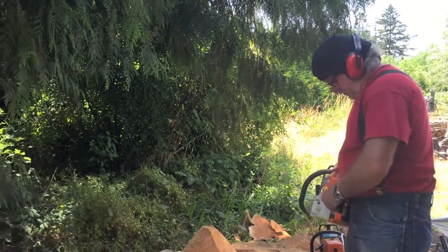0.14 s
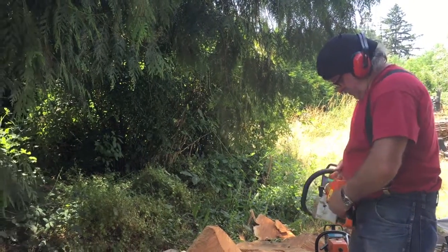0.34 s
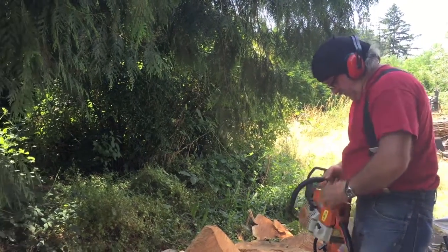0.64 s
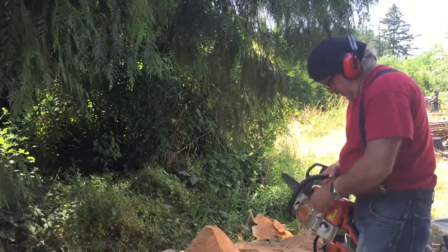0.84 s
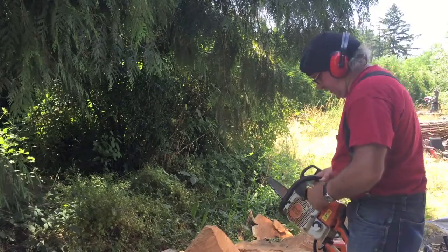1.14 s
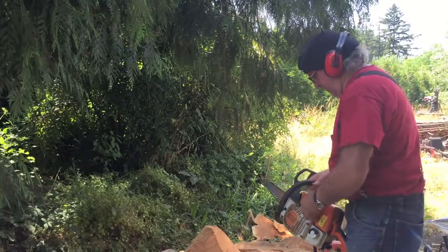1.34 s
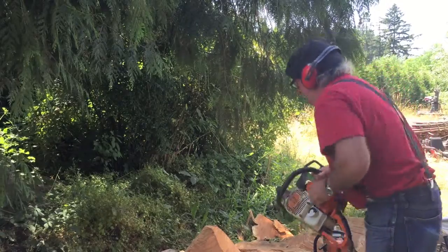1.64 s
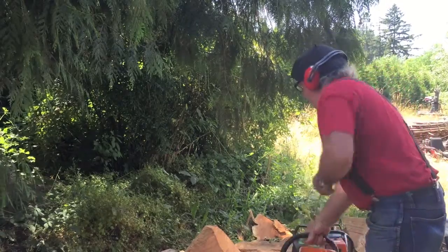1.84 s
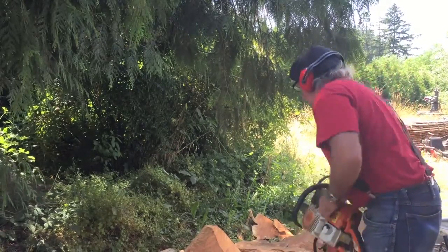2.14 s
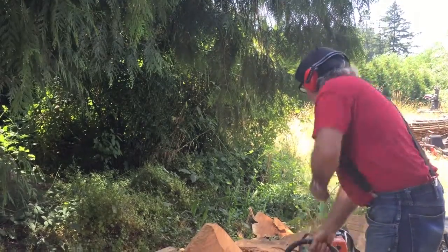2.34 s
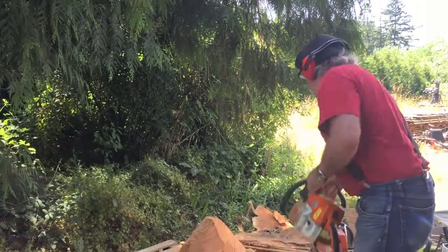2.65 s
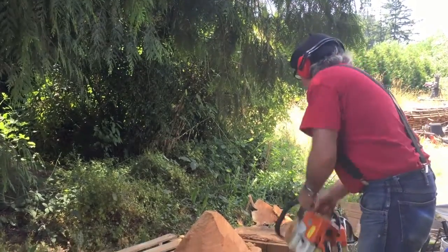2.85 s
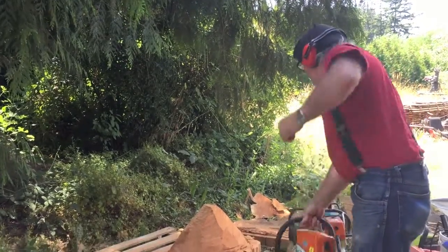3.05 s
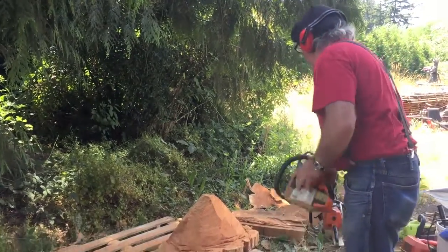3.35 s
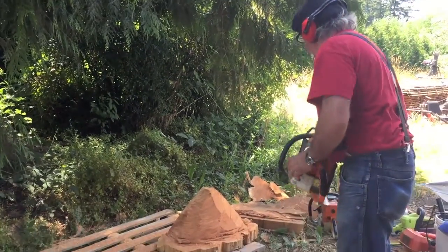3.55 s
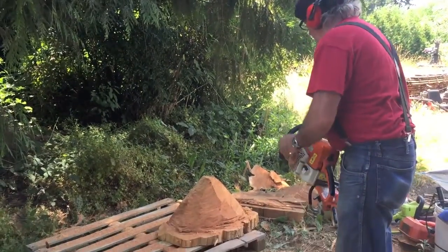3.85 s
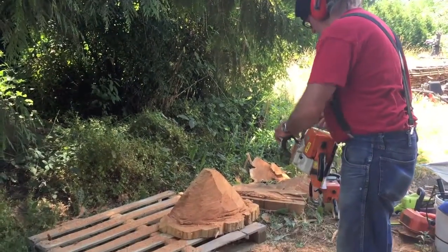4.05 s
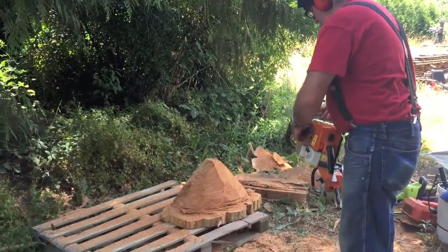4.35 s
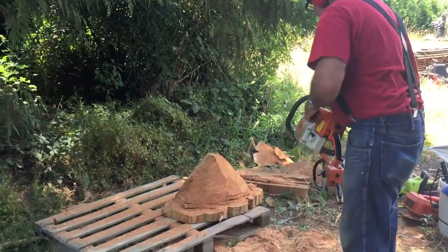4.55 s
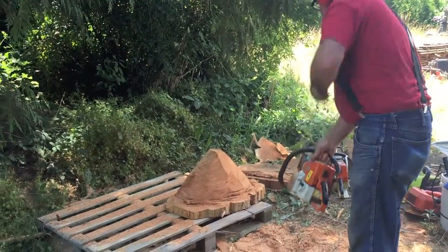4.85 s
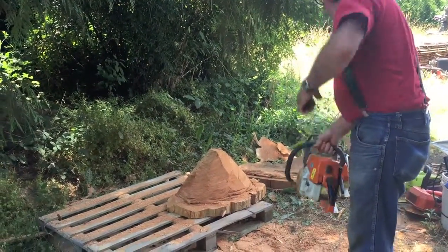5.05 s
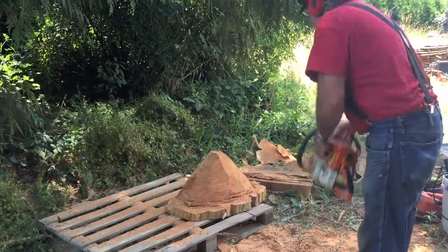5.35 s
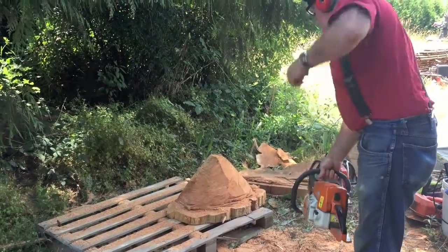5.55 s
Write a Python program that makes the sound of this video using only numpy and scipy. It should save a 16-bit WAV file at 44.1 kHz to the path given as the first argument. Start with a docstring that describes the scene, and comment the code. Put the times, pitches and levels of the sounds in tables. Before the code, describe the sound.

In a quiet clearing, a chainsaw a few metres from the microphone is clicked and handled, then pulled three times in quick succession. Each pull gives a hard clack, a raspy whirr and rapid low chuffs that slow down. The third kicks briefly with a metallic chain rattle. After a loud clack and a quieter pause, two more pulls fail. A faint bird whistles.

```python
"""Chainsaw that will not start

A chainsaw is drop-started five times in a clearing, a few metres away, and does not catch: pawls clack in as chattering
noise through resonances, the cord whirrs as coloured noise, and the piston chuffs with pulses and decaying sines, slowing
as the crank coasts. On the third pull one kick speeds up the crank and rattles the chain. The saw is handled and its
switches click, and a far bird whistles in arched sine notes over a hush of coloured noise."""
import sys
import numpy as np
from scipy import signal
from scipy.fft import rfft, irfft, next_fast_len
from scipy.io import wavfile

SR = 44100
rng = np.random.default_rng(int(sys.argv[2]) if len(sys.argv) > 2 else 0)


def transcribe(signal):
    """Save signal, clipped to [-1, 1], as a 16-bit WAV file at the path in sys.argv[1]."""
    frames = np.atleast_2d(signal).T
    limited = np.clip(frames, -1, 1)
    pcm = np.round(limited * 32767).astype(np.int16)
    wavfile.write(sys.argv[1], SR, pcm)


N = 252010
TIME = np.arange(N) / SR

# Pulls of the cord. Each row: pawls catch in seconds, delay to the first full chuff in seconds,
# crank turns per second, hold in seconds, coasting time constant in seconds.
PULLS = [(1.831, .0595, 31.66, .0541, .1153), (2.363, .0541, 36.25, .0649, .2272),
         (2.914, .0623, 33.92, .2578, .2313), (4.834, .054, 31.64, .0787, .2913),
         (5.441, .056, 33.8, .1319, .1329)]
# The sound of each pull. Each row: whirr in dB before the cord's trim, chuff in dB, clack in dB, clack in Hz,
# snap in dB re clack, weakening per earlier skip in dB.
PULL_SOUNDS = [(-40.5, -25, -22, 1310, -2, 16), (-40, -25, -17.5, 1360, -3.5, 4.5),
               (-42, -25, -22, 1430, -8, 29), (-43.5, -25.5, -20.5, 1410, 1, 6),
               (-43, -23.5, -21, 1520, -7.5, 16)]
# Sharp clicks of switches, handle and hard parts. Each row: start in seconds, level in dB,
# clack in Hz, snap in dB re level.
CLICKS = [(.13, -29.5, 2370, -3.5), (0.264, -57, 2600, -4), (.29, -36.5, 2300, -12.5),
          (0.484, -50.5, 2060, -17), (1.04, -59.5, 2120, 4), (1.083, -38, 1030, -6),
          (1.127, -45.5, 1070, 7), (1.15, -29.5, 1510, -5), (1.178, -60.5, 1450, 14),
          (1.362, -60.5, 1550, 9.5), (1.468, -51, 1530, 8), (1.493, -36, 1490, -2),
          (2.277, -51.5, 2200, -4), (2.648, -59, 2280, -15), (3.03, -30.5, 1280, -4.5),
          (3.049, -25.5, 2280, 0.5), (3.068, -24.5, 2570, -5), (3.183, -33, 1400, 2),
          (3.347, -17.5, 1420, -3), (3.421, -44, 2280, -24), (3.495, -47.5, 2100, -43),
          (3.543, -50.5, 2650, 2), (3.775, -49.5, 2320, -7.5), (4.054, -54.5, 1880, -12.5),
          (4.239, -45.5, 2280, 0.5), (4.427, -45, 1135, -20), (4.494, -32, 1704, -5), (4.633, -56, 1520, 0),
          (4.709, -62.5, 2480, 5.5), (4.971, -34.5, 1040, -4), (5.146, -40.5, 2270, -9),
          (5.23, -48.5, 1220, -4), (5.32, -42, 1460, -14), (5.422, -44.5, 1830, 1)]
# The one firing speeds the crank up by the share KICK_GAIN.
KICK_S, KICK_RISE_S, KICK_GAIN = 3.015, .015, .3045


def from_db(db):
    """Decibels to gain."""
    return 10 ** (np.asarray(db) / 20)


def rms_one(x):
    """Scale to unit power."""
    return x / np.sqrt(np.mean(x ** 2) + 1e-20)


def unit_energy(x):
    """Scale a short sound to the energy of 5 ms at unit power."""
    return x / np.sqrt(np.sum(x ** 2) / (.005 * SR) + 1e-20)


def add(track, s, sound):
    """Mix a sound into the track at a time in seconds."""
    at = max(int(s * SR), 0)
    track[at:at + len(sound)] += sound[:N - at]


def cut(x, hz, kind, order=2):
    """Butterworth low- or high-pass."""
    return signal.sosfilt(signal.butter(order, min(hz, .45 * SR), kind, fs=SR, output="sos"), x)


def resonate(x, hz, width_hz):
    """One two-pole resonance with a gain near 1 on top."""
    r = np.exp(-np.pi * width_hz / SR)
    feed = np.array([1, 0, -1]) * (1 - r * r) / 2
    return signal.lfilter(feed, [1, -2 * r * np.cos(2 * np.pi * hz / SR), r * r], x)


def colour(x, spectrum):
    """Give a steady sound a smooth spectrum, interpolated over log frequency; unit power."""
    hz, db = np.transpose(spectrum)
    size = next_fast_len(N)
    log_hz = np.log(np.maximum(np.fft.rfftfreq(size, 1 / SR), 1))
    gain = from_db(np.interp(log_hz, np.log(hz), db))
    return rms_one(irfft(rfft(x, size) * gain, size)[:N])


def drift(per_s):
    """Random curve with spread near 1: straight lines between random points, per_s of them a second."""
    return np.interp(TIME * per_s, np.arange(4000), rng.standard_normal(4000))


def ticks(per_s, size_db):
    """Random small contacts of uneven size and either sign; unit power."""
    sizes = from_db(size_db * np.minimum(rng.exponential(1, N), 3))
    happens = rng.random(N) < per_s / SR
    return rms_one(happens * rng.choice([-1, 1], N) * sizes)


def air(rumble_db=-72, rumble_hz=66, rumble_width_hz=28, swell_db=5.5):
    """Still air among the trees: a faint hush of coloured noise over a low, uneven rumble of resonant noise."""
    # Colour of the hush. Each row: frequency in Hz, relative density in dB per Hz.
    air_colour = [(25, -18.5), (45, -4), (70, 8.5), (110, 0.5), (200, -6), (400, -9.5), (700, -8.5),
                  (1000, -6.5), (1500, -14), (2200, -15.5), (3300, -21), (6000, -24.5), (10000, -28),
                  (15000, -33.5)]
    # Its slow level curve. Each row: time in seconds, level in dB.
    air_levels = [(0, -64.5), (0.8, -63), (1.7, -63.5), (3.9, -66), (4.7, -65.5), (5.71, -62.5)]
    level = from_db(np.interp(TIME, *np.transpose(air_levels)))
    hush = level * colour(rng.standard_normal(N), air_colour)
    rumble = resonate(rng.standard_normal(N), rumble_hz, rumble_width_hz)
    rumble = rms_one(resonate(rumble, rumble_hz, rumble_width_hz))
    return hush + from_db(rumble_db + swell_db * drift(10)) * rumble


def bird(sag=0.21, waver=0.028):
    """Each call is an arched, slightly hoarse whistle with a weaker, higher second voice."""
    # One note a call. Each row: start in seconds, length in seconds, top of the arch in Hz before waver, level in dB.
    calls = [(0.538, 0.1, 1804, -54), (2.154, 0.09, 1750, -62.5), (4.082, 0.0844, 1782, -52.5)]
    upper_ratio, upper_db = 1.62, -9
    out = np.zeros(N)
    for s, length, hz, db in calls:
        u = np.linspace(-1, 1, int(length * SR))
        pitch = hz * (1 - sag * u * u + waver * drift(610)[:len(u)])
        phase = 2 * np.pi * np.cumsum(pitch) / SR
        voices = np.sin(phase) + from_db(upper_db) * np.sin(upper_ratio * phase)
        add(out, s, from_db(db) * (1 - u * u) ** 2 * voices)
    return out


def shell(x):
    """The hard parts of the saw ring side by side, with alternating sign."""
    # Resonances rung by clacks, cord and rattles. Each row: frequency in Hz, width in Hz, gain in dB.
    shell_modes = [(2220, 67, -1), (2604, 50, -11), (3418, 410, -2), (4030, 130, 2.5), (4470, 310, -2),
                   (5435, 340, 3.5), (5670, 1200, -1), (6930, 520, 1.5), (7180, 410, -0.5),
                   (8900, 970, -1.5), (9500, 1200, -6.5), (13100, 4700, -8)]
    return sum((-1) ** k * from_db(db) * resonate(x, hz, width) for k, (hz, width, db) in enumerate(shell_modes))


def knock(thud_db, thud_hz, clack_db, clack_hz, snap_db, rise_s=0.0029, fall_s=0.0028, thud_width_hz=130,
          clack_width_hz=300, hollow_db=-8, case_db=-3, case_hz=1500, case_width_hz=900, crack_db=-15):
    """One contact: a few ms of chatter that rings the hollow housing, the struck plastic part and the hard shell."""
    t = np.arange(int(.05 * SR)) / SR
    contact = np.minimum(t / rise_s, 1) ** 2 * np.exp(-np.maximum(t - rise_s, 0) / fall_s)
    low, mid, high = rng.laplace(size=(3, len(t))) * contact
    thud = unit_energy(resonate(low, thud_hz, thud_width_hz))
    thud = thud + from_db(hollow_db) * unit_energy(resonate(mid, 400, 280))
    thud = cut(cut(thud, 380, "high", order=4), 980, "low")
    clack = unit_energy(resonate(mid, clack_hz, clack_width_hz))
    clack = clack + from_db(case_db) * unit_energy(resonate(low, case_hz, case_width_hz))
    clack = cut(cut(clack, 680, "high"), 2700, "low", order=4)
    snap = shell(high) + from_db(crack_db) * cut(high, 4100, "high")
    return (from_db(thud_db) * unit_energy(thud)
            + from_db(clack_db) * unit_energy(clack)
            + from_db(snap_db) * unit_energy(snap))


def clicks_and_thumps(click_thud_db=-9.0, click_thud_hz=700, thump_clack_db=-11, thump_clack_hz=1150, early_s=0.0014):
    """Clicks ring mostly the struck part, thumps mostly the housing."""
    # Hollow thumps of the housing, from handling and from turns of the crank.
    # Each row: start in seconds, level in dB, thud in Hz, snap in dB re level.
    thumps = [(0.943, -43, 750, -4), (0.958, -40.5, 750, -14), (.99, -47, 660, -23), (1.049, -39, 985, -10),
              (1.394, -46, 1040, -16), (1.747, -50, 1070, -19), (2.102, -46, 490, -3.5),
              (2.236, -31.5, 640, -16), (2.613, -39.5, 490, -7), (2.795, -30.5, 1026, -18),
              (2.821, -40.5, 830, -14), (2.939, -36, 680, -35), (4.404, -48, 1010, -20),
              (4.767, -54, 1120, -16), (5.299, -36, 1000, -28), (5.461, -38, 656, -16)]
    out = np.zeros(N)
    for s, db, hz, snap_db in CLICKS:
        add(out, s - early_s, knock(db + click_thud_db, click_thud_hz, db, hz, db + snap_db))
    for s, db, hz, snap_db in thumps:
        add(out, s - early_s, knock(db, hz, db + thump_clack_db, thump_clack_hz, db + snap_db))
    return out


def rattles(per_s=2500, size_db=4):
    """Dense little contacts swell and fade, ringing the hard shell."""
    # Hard parts rattling together as the saw is handled. Each row: start in seconds, length in seconds, level in dB.
    bursts = [(1.124, .035, -45), (1.152, 0.059, -50), (1.459, 0.038, -46.5), (1.495, 0.07, -61.5),
              (4.493, 0.06, -56)]
    level = np.zeros(N)
    for s, length, db in bursts:
        add(level, s, from_db(db) * np.hanning(int(length * SR)))
    return level * rms_one(shell(ticks(per_s, size_db)))


def crank_speed(s, per_s, hold_s, coast_s):
    """Turns per second in one pull: steady while the cord is drawn, faster if the engine kicks, then coasting down."""
    speed = per_s * (TIME >= s) * np.exp(-np.maximum(TIME - s - hold_s, 0) / coast_s)
    if s < KICK_S < s + hold_s:
        return speed * (1 + KICK_GAIN * np.clip((TIME - KICK_S) / KICK_RISE_S, 0, 1))
    return speed


def crank_turns(stall_per_s=8, feeble_per_s=17.6, feeble_db_per_octave=17.5, boom_hz=66.46, boom_hz_per_speed=2.05,
                first_turn_db=-15.5):
    """One row (s, level dB, boom Hz) a turn: slow turns boom lower and fade, until compression stalls the piston."""
    # The piston rocks over again after the kick. Each row: start in seconds, level in dB, nominal boom in Hz.
    rock_back = [(3.63, -47, 90.7), (3.786, -40, 71.8), (4.25, -44.5, 101)]
    kick_pop = (3.049, -31, 80)   # the firing booms in the muffler
    rows = list(rock_back) + [kick_pop]
    for (s, delay_s, per_s, hold_s, coast_s), (_, chuff_db, *_) in zip(PULLS, PULL_SOUNDS):
        speed = crank_speed(s, per_s, hold_s, coast_s)
        turns = np.cumsum(speed * (TIME >= s + delay_s)) / SR
        # the turn before the first full chuff has little compression
        rows.append((s + delay_s - 1 / per_s, chuff_db + first_turn_db, boom_hz + boom_hz_per_speed * per_s))
        new_turn = np.diff(np.ceil(turns)) > 0
        for at in np.flatnonzero(new_turn & (speed[1:] > stall_per_s)):
            fade_db = feeble_db_per_octave * min(np.log2(speed[at] / feeble_per_s), 0)
            rows.append((at / SR, chuff_db + fade_db, boom_hz + boom_hz_per_speed * speed[at]))
    return rows


def loose_parts(turns, slow_boom_hz=101, thud_db=-17, thud_hz=600, clack_db=-16, clack_hz=2150, snap_db=-29,
                early_s=0.0021):
    """Slow turns, known by their low boom, jerk against compression, and loose parts knock."""
    out = np.zeros(N)
    for s, db, boom_hz in turns:
        if boom_hz < slow_boom_hz:
            add(out, s - early_s, from_db(db) * knock(thud_db, thud_hz, clack_db, clack_hz, snap_db))
    return out


def chain(level_db=-29, attack_s=0.045, fade_db_per_s=100, flutter_db=4.5):
    """The kick spins the chain: links clatter densely over sprocket and bar, then fade away unevenly."""
    # Colour of the clatter. Each row: frequency in Hz, relative density in dB per Hz.
    clatter = [(150, -27.5), (500, -1), (1000, -12.5), (1500, 6.5), (1900, -2), (2400, 8), (3100, 0.5),
               (3750, 11.5), (4600, 0.5), (6800, 3.5), (8200, -14), (15000, -9.5)]
    t = TIME - KICK_S
    fade_db = fade_db_per_s * np.maximum(t - attack_s, 0)
    level = np.clip(t / attack_s, 0, 1) * from_db(level_db - fade_db + flutter_db * drift(250))
    return level * colour(ticks(per_s=14000, size_db=3.0), clatter)


def pawls(thud_db=-10, thud_hz=800, early_s=0.0009, skip_s=0.006):
    """The starter pawls skip twice, ever harder, and catch the flywheel."""
    out = np.zeros(N)
    for (s, *_), (_, _, db, clack_hz, snap_db, skip_db) in zip(PULLS, PULL_SOUNDS):
        for k in range(3):   # counted back from the catch
            clack = knock(db + thud_db, thud_hz, db, clack_hz, db + snap_db)
            add(out, s - early_s - k * skip_s, from_db(-k * skip_db) * clack)
    return out


def whirr(turns, level_db=-1, tick_db=2, ring_db=-6, flutter_db=3.5, hiss_db=-11, hiss_hz=10500, fast_db=-43,
          jolt_db=-23, jolt_s=0.027, jolt_lead_s=0.008, speed_power=2.05, bite_db=2, bite_s=0.033,
          slack_db=-48, slack_s=0.057, scrape_db=-20, scrape_s=0.028):
    """The cord rubs through its eye while the ratchet ticks, louder with speed; both ring the shell, with a fast hiss."""
    # Colour of the running cord. Each row: frequency in Hz, relative density in dB per Hz.
    cord_colour = [(100, -4.5), (270, -4), (550, 2.5), (850, 1), (1400, 2.5), (1900, -2), (2350, -1),
                   (3000, -4.5), (3750, -2.5), (4400, -9.5), (6400, -15), (8500, -14), (11000, -22.5),
                   (15000, -14.5)]
    # Rubs of hand, handle and rewinding cord.
    # Each row: start in seconds, length in seconds, level in dB before the cord's trim.
    rubs = [(0.925, .019, -62), (1.103, 0.064, -55), (1.158, 0.1, -62), (1.33, 0.1, -61),
            (1.443, 0.12, -59), (1.901, 0.078, -41), (2.013, 0.035, -49), (2.066, 0.15, -54),
            (2.218, 0.099, -52), (2.611, 0.08, -49.5), (2.782, 0.014, -58), (3.344, .075, -48),
            (3.826, 0.061, -70), (4.379, 0.062, -62), (4.466, 0.082, -52), (5.204, 0.19, -68)]
    running, scrapes = np.zeros(N), np.zeros(N)
    for (s, _, per_s, hold_s, coast_s), (db, *_) in zip(PULLS, PULL_SOUNDS):
        speed = crank_speed(s, per_s, hold_s, coast_s)
        bite = from_db(bite_db * np.exp(-np.abs(TIME - s) / bite_s))   # the cord bites hardest at the catch
        running += from_db(db) * bite * (speed / speed.max()) ** speed_power
        # the slack is taken up
        add(scrapes, s - slack_s / 2, from_db(slack_db) * np.hanning(int(slack_s * SR)))
    for s, db, _ in turns:   # every turn of the crank shakes the ratchet
        add(scrapes, s - jolt_lead_s, from_db(db + jolt_db) * np.hanning(int(jolt_s * SR)))
    for s, db, *_ in CLICKS:   # a short, soft scrape swells around each click
        add(scrapes, s - scrape_s / 4, from_db(db + scrape_db) * np.hanning(int(scrape_s * SR)))
    for s, length, db in rubs:
        add(scrapes, s, from_db(db) * np.hanning(int(length * SR)))
    rub = rng.standard_normal(N) + from_db(tick_db) * ticks(per_s=450, size_db=2.5)
    sound = rms_one(colour(rub, cord_colour) + from_db(ring_db) * rms_one(shell(rub)))
    fast = np.minimum(running / from_db(fast_db), 1)
    thin_noise = rms_one(cut(rng.standard_normal(N), hiss_hz, "high", order=3))
    hiss = from_db(hiss_db) * running * fast * thin_noise
    return from_db(level_db + flutter_db * drift(200)) * ((running + scrapes) * sound + hiss)


def steel(x):
    """The steel parts pick up the mechanical noise and ring at their own pitches."""
    # Bar and clutch drum, ringing on after contacts. Each row: frequency in Hz, width in Hz, gain in dB.
    steel_modes = [(2286, 44, -10.5), (2790, 4.8, -8.5), (3810, 8.3, -2), (3480, 5, -8.5), (3770, 14, -5),
                   (5120, 42, -4), (5600, 25, -6.5)]
    return x + sum(from_db(db) * resonate(x, hz, width) for hz, width, db in steel_modes)


def chuffs(turns, puff_db=1, boom_db=-7, boom_t60=0.091, lead_db=-11, intake_db=-14, gas_db=-22, gas_s=0.028,
           gas_ratio=2.7, gas_width_hz=550, vary_db=7.5, force_db=-25, detune=.04, sag=0.068, sag_s=.025):
    """The port opens on an unfired cylinder: a small push, a sharp gulp of air, a muffler boom, a softer intake gulp."""
    # Further resonances of saw body and intake, rung by each chuff.
    # Each row: frequency in Hz, mean level in dB, decay by 60 dB in seconds.
    cavity = [(83.3, -18.5, 0.075), (183, -25.5, 0.079), (318.6, -17.5, 0.074), (465, -42, 0.043),
              (611, -32.5, 0.016), (920, -19.5, 0.015)]
    out = np.zeros(N)
    t = np.arange(int(.15 * SR)) / SR - .006
    puff_s, lead_s, ground_s = .00029, .003, .00185
    late = np.maximum(t - puff_s * 3, 0)

    def pulse(at):
        return np.exp(-.5 * ((t - at) / puff_s - 2) ** 2)

    for s, db, boom_hz in turns:
        gulp = -from_db(puff_db) * pulse(0)
        push = from_db(lead_db) * pulse(-lead_s)
        intake = -from_db(intake_db + vary_db * rng.normal()) * pulse(2 / boom_hz)
        # the pitch sags as the cylinder empties
        bend = 1 + sag * (1 - late / sag_s) / (1 + late / sag_s)
        cycles = boom_hz * (1 + detune * rng.normal()) * late * bend
        boom = from_db(boom_db - 60 * late / boom_t60) * np.sin(2 * np.pi * cycles)
        rings = np.zeros(len(t))
        for hz, mode_db, t60 in cavity:
            ring_db = mode_db + vary_db * rng.normal() - 60 * late / t60
            rings += from_db(ring_db) * np.sin(2 * np.pi * hz * late)
        # slower gas, lower rush
        gas = rms_one(resonate(rng.standard_normal(len(t)), gas_ratio * boom_hz, gas_width_hz))
        gas = gas * np.exp(-late / gas_s) * (late > 0)
        edge = min(from_db((db - force_db) / 2), 1)   # a feeble turn leaks out softly
        sound = from_db(db) * (boom + edge * (gulp + push + intake + rings + from_db(gas_db) * gas))
        add(out, s + t[0], sound)
        add(out, s + t[0] + ground_s, .5 * sound)   # the bounce off the ground hollows out the low mids
    return cut(out, 48, "high", order=5)


def clearing(x, near_db=-13, near_t60=0.097, far_db=-29, far_t60=0.4, dull_hz=8000, thin_hz=300):
    """Ground, timber and branches scatter a short tail; the trees return a longer, fainter one."""
    t = np.arange(int(.8 * SR)) / SR
    decay = from_db(-60 * t / np.array([[near_t60], [far_t60]]))
    near, far = rng.standard_normal((2, len(t))) * np.minimum(t / 0.008, 1) * decay
    far = cut(far, 6000, "low")
    echo = from_db(near_db) * near / np.linalg.norm(near) + from_db(far_db) * far / np.linalg.norm(far)
    echo = cut(cut(echo, dull_hz, "low", order=1), thin_hz, "high", order=1)
    return x + signal.fftconvolve(x, echo)[:N]


def scene():
    """The saw and the bird among the trees."""
    turns = crank_turns()
    hush, call = air(), bird()
    mechanics = clicks_and_thumps() + rattles() + loose_parts(turns) + chain() + pawls() + whirr(turns)
    saw = steel(mechanics) + chuffs(turns)
    return (clearing(saw + call) + hush)[None]


def record(dry):
    """The top is cut steeply above 15.5 kHz."""
    return signal.sosfilt(signal.ellip(10, .2, 75, 15500, fs=SR, output="sos"), dry)


dry = scene()
out = record(dry)
transcribe(out)
```